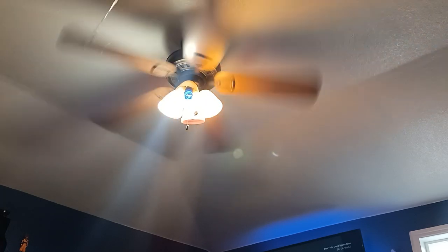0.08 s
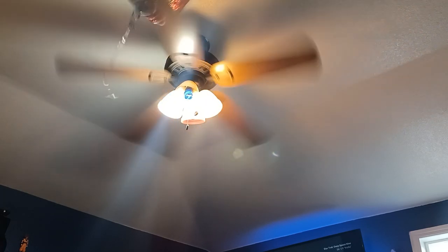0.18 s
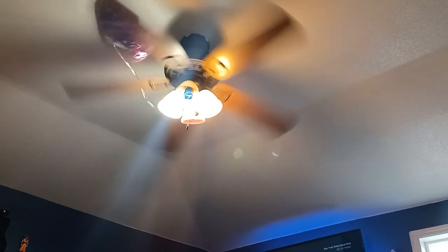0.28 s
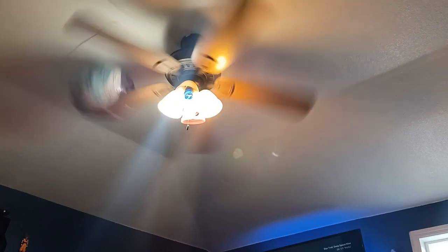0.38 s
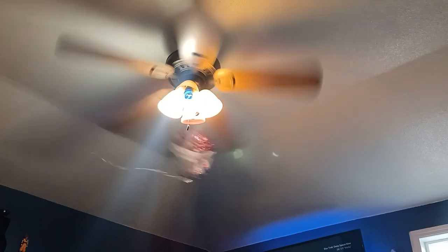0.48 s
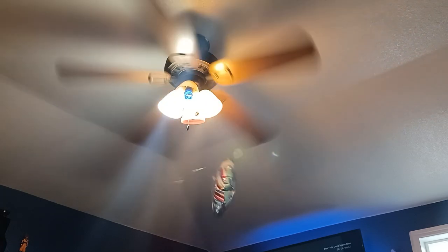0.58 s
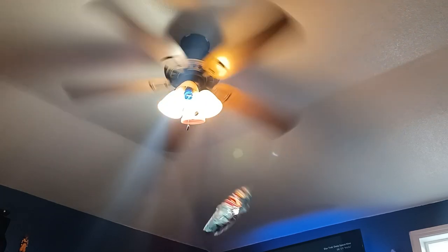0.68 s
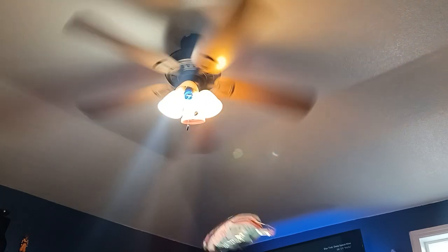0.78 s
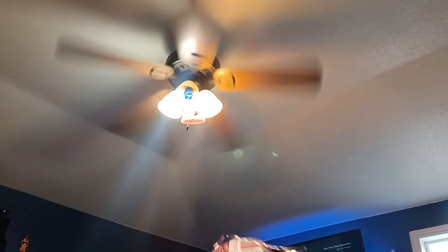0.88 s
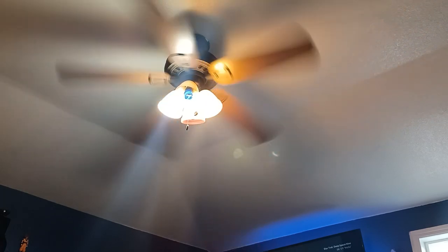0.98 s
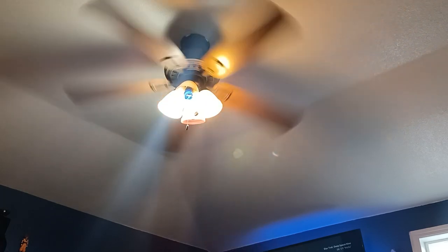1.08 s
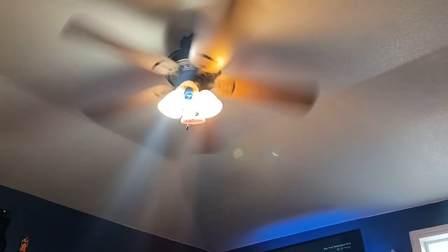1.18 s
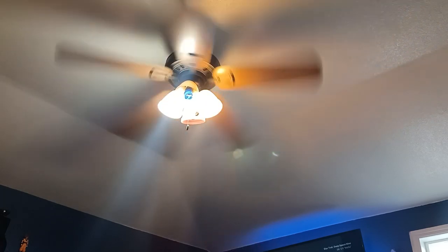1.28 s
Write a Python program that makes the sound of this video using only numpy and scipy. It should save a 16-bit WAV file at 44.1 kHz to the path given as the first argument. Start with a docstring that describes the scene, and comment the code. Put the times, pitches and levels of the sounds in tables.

```python
"""A foil balloon drifts into a spinning ceiling fan in a small room, over a steady motor hum and rush of air.
The blades graze it, smack it twice and fling it away, with a weaker blow later on.
Blows buckle the skin in runs of pops (filtered random clicks) and set the foil crinkling (denser clicks);
hard snaps are single pulses, and pushes on the gas ring decaying sine modes.
The balloon then flutters and wafts low puffs of air, and rustles faintly as it falls (shaped noise)."""
import sys
import numpy as np
from scipy.fft import rfft, irfft
from scipy.io import wavfile
from scipy.ndimage import uniform_filter1d

SR = 44100
rng = np.random.default_rng(int(sys.argv[2]) if len(sys.argv) > 2 else 0)


def persist_wave(psi):
    """Save psi, clipped to +-1, as 16-bit WAV."""
    counts = np.round(np.clip(psi, -1, 1) * 32767).astype(np.int16)
    wavfile.write(sys.argv[1], SR, np.atleast_2d(counts).T)


N = 59535
T = np.arange(N) / SR
SIZE = 2 ** 17  # transform length, samples
HZ = np.maximum(np.arange(SIZE // 2 + 1) * SR / SIZE, 1)
PLACES = 5  # sounding places on the tumbling balloon

# relative spectrum of a buckling panel of skin: frequency_hz, density_db (per Hz)
PANEL_SPECTRUM = [(25, -42.5), (55, -20), (100, -14), (150, -16.5), (190, -12), (230, 1.5), (290, 1.5),
                  (370, -3), (520, 2), (850, -2), (1300, -2.5), (1800, -3.5), (2400, -16.5), (4500, -21),
                  (9000, -45)]
# relative spectrum of the large creases: frequency_hz, density_db (per Hz)
LARGE_CREASE_SPECTRUM = [(150, -17.5), (500, -4.5), (2000, 1.5), (3200, 2), (5400, 1.5), (7000, -3),
                         (8300, -15.5), (10000, -15), (15500, -26)]
# relative spectrum of the tiny creases: frequency_hz, density_db (per Hz)
TINY_CREASE_SPECTRUM = [(3000, -30), (7000, -20), (8500, -10.5), (10000, -5), (12800, -0.5), (15500, -5)]


def from_db(db):
    """Level to amplitude ratio: 20 dB is a factor of ten."""
    return 10 ** (np.asarray(db) / 20)


def rms_one(x):
    """Normalization: mean square of one."""
    return x / np.sqrt(np.mean(x ** 2) + 1e-20)


def at_hz(points, hz):
    """Interpolation along a logarithmic frequency axis."""
    frequency_hz, value = np.transpose(points)
    return np.interp(np.log(hz), np.log(frequency_hz), value)


def at_time(points):
    """Amplitude envelope from levels interpolated linearly in decibels."""
    return from_db(np.interp(T, *np.transpose(points)))


def pan(db):
    """Level-difference stereo: half the difference is added left and taken off right."""
    return from_db(np.array([[.5], [-.5]]) * db)


def colour(points):
    """Minimum-phase response: folding the cepstrum makes a given spectrum causal, at unit power."""
    cepstrum = irfft(np.log(rms_one(from_db(at_hz(points, HZ)))))
    cepstrum[1:SIZE // 2] *= 2
    cepstrum[SIZE // 2 + 1:] = 0
    return np.exp(rfft(cepstrum))


def through(x, response):
    """Linear filtering: convolution is multiplication of spectra."""
    return irfft(rfft(x, SIZE) * response, SIZE)[..., :N]


def delay(seconds):
    """A time delay is a phase proportional to frequency."""
    return np.exp(-2j * np.pi * HZ * seconds)


def diffuse():
    """Interaural coherence: mid and side noise are mixed to a set left-right correlation in each band."""
    # left-right correlation: frequency_hz, correlation (-1 to 1)
    likeness = [(100, 0.77), (280, 1), (600, -0.13), (1100, -0.44), (1800, -0.78), (3500, -.4),
                (7000, -0.086), (14000, -0.27)]
    alike = np.clip(at_hz(likeness, HZ), -.99, .99)
    mid_side_gains = np.sqrt([(1 + alike) / 2, (1 - alike) / 2])
    mid, side = through(rng.standard_normal((2, N)), mid_side_gains)
    return np.array([mid + side, mid - side])


def room_tails():
    """Reverberation: from each place, diffuse echoes decay exponentially at a rate set in each octave."""
    # reverberation time: frequency_hz, t60_s
    room_t60 = [(100, 0.59), (300, 0.39), (1000, .36), (5000, .34), (14000, 0.23)]
    first_echo_s = .0011
    early_db, early_s = -3, .0027  # extra strength and life of the first echoes, off the ceiling
    length = 2 ** 15
    centres_hz = 62.5 * 2 ** np.arange(9)
    noise = rfft(np.array([diffuse()[:, :length] for _ in range(PLACES)]))
    t = T[:length]
    log_hz = np.log(HZ[::SIZE // length])
    early = 1 + from_db(early_db) * np.exp(-t / early_s)
    tails = 0
    for k, hz in enumerate(centres_hz):
        # triangular band, one at its own centre and zero at the neighbours
        band = np.interp(log_hz, np.log(centres_hz), np.arange(len(centres_hz)) == k)
        decay = from_db(-60 * t / at_hz(room_t60, hz)) * (t > first_echo_s) * early
        tails = tails + irfft(noise * band) * decay / np.sqrt(np.sum(decay ** 2))
    return rfft(tails, SIZE)


def heard(tail, room_db):
    """Direct-to-reverberant ratio: the two powers are weighted to a sum of one."""
    return (1 + from_db(room_db) * tail) / np.sqrt(1 + from_db(2 * room_db))


def fan():
    """Steady tones of wavering amplitude (motor hum) over broadband flow noise (air off the blades)."""
    # motor tones: frequency_hz, level_db (RMS before the waver)
    hum = [(120.5, -67), (228, -74.5)]
    # relative spectrum of the rushing air: frequency_hz, density_db (per Hz)
    air = [(25, -34), (42, -19), (62, -8), (110, -3.5), (170, -3.5), (290, -2.5), (380, -4.5), (480, -10),
           (800, -23), (1300, -21.5), (2200, -36.5), (5000, -51.5), (15000, -39)]
    air_db, waver_depth = -66.5, .25
    out = from_db(air_db) * through(diffuse(), colour(air))
    for hz, db in hum:
        waver = np.interp(T, np.linspace(0, T[-1], num=16), rng.standard_normal(size=16))
        tone = np.sin(2 * np.pi * (hz * T + rng.random()))
        out = out + np.sqrt(2) * from_db(db) * (1 + waver_depth * waver) * tone
    return out


def fall():
    """Friction noise: the balloon rustles faintly on its way down, as shaped noise under an envelope."""
    # rustle envelope: time_s, level_db
    fall_levels = [(.6, -70.5), (.78, -62), (.86, -61), (.95, -63), (1.03, -69), (1.12, -81.5), (1.35, -94)]
    # relative spectrum of the rustle: frequency_hz, density_db (per Hz)
    fall_spectrum = [(30, -23.5), (100, -7.5), (260, 2), (600, -9), (1000, -8.5), (1600, -8), (2400, -18.5),
                     (3700, -22.5), (5500, -15.5), (8000, -32), (13000, -31), (16000, -36.5)]
    return at_time(fall_levels) * through(diffuse(), colour(fall_spectrum))


def waft():
    """Displacement of air: the limp body wobbles and pushes soft, low puffs, as low-frequency noise."""
    # puff envelope: time_s, level_db
    waft_levels = [(0, -57), (.1, -56), (.3, -76), (.5, -51), (.62, -56), (.71, -68.5), (.8, -91.5)]
    # relative spectrum of the puffs: frequency_hz, density_db (per Hz)
    waft_spectrum = [(30, -34.5), (50, -15.5), (70, -10), (105, -4), (150, -1.5), (250, -14), (800, -64)]
    return at_time(waft_levels) * through(diffuse(), colour(waft_spectrum))


def thumps():
    """Modal resonance: a push makes the gas inside ring hollowly, swelling while the blade presses in."""
    # pushes on the gas: start_s, low_modes_db, upper_modes_db, focus_hz (where upper modes are struck best)
    pushes = [(.207, -24.5, -26, 864), (.301, -14, -19, 522), (0.895, -52, -62, 398.3)]
    # modes of the balloon: frequency_hz, level_db (relative), t60_s
    modes = [(152, -13, .22), (227, 0, .33), (258, -4, .22), (279, 1, .27), (459, -1, .34), (511, -8, .3),
             (553, -3, .26), (588, -6, .3), (790, -3, .24), (880, -3, .28), (921, -6, .2), (1080, -3, .28),
             (1213, -5, .4), (1335, -2, .24), (1393, -3, .22)]
    low_modes_below_hz, focus_db_per_octave, swell_s = 350, 8, .024
    out = np.zeros(N)
    for start_s, low_db, upper_db, focus_hz in pushes:
        age = np.maximum(T - start_s, 0)
        swell = np.minimum(age / swell_s, 1)
        for hz, mode_db, t60_s in modes:
            if hz < low_modes_below_hz:
                push_db = low_db
            else:
                push_db = upper_db - focus_db_per_octave * abs(np.log2(hz / focus_hz))
            ring = from_db(push_db + mode_db - 60 * age / t60_s)
            out += swell * ring * np.sin(2 * np.pi * hz * age)
    return out


def clicks(per_s, spread_db):
    """Random impulse process: uneven clicks, evened in short-term power, are dealt out among the places."""
    happens = rng.random(N) < per_s / SR
    size = from_db(spread_db * rng.standard_normal(N))
    train = happens * size * rng.choice([-1, 1], N)
    local_power = np.abs(uniform_filter1d(train ** 2, size=300))
    train = train / np.sqrt(local_power + 1e-6)
    return train * (rng.integers(0, PLACES, N) == np.arange(PLACES)[:, None])


def strain(level_column, release_s, flutter_db):
    """Power summation: each blow works the skin by attack, hold and release, over the flutter."""
    # blade contacts and jolts of the skin: start_s, length_s, pops_db, crinkle_db
    blows = [(0.0, 0.069, -52.5, -46), (0.046, 0.0087, -43.5, -39.5), (0.105, 0.015, -43, -41),
             (0.125, 0.0093, -39, -35.5), (.134, .022, -40, -43.5), (0.204, .005, -28, -31.5),
             (0.2097, 0.018, -27, -25), (0.299, .017, -15.5, -23), (0.318, .009, -15, -23),
             (0.328, 0.027, -21.5, -28.5), (0.472, 0.0067, -41, -53), (0.562, 0.014, -31.5, -32)]
    # loose foil between the blows: time_s, level_db (before flutter_db is added)
    flutter = [(0, -44.5), (.09, -51), (.185, -61), (.28, -50.5), (.35, -33), (.40, -34), (.45, -40.5),
               (.5, -35), (.54, -39.5), (.6, -36), (.66, -83), (.72, -91)]
    attack_s = .001
    power = (at_time(flutter) * from_db(flutter_db)) ** 2
    for blow in blows:
        start_s, length_s = blow[:2]
        attack = np.clip((T - start_s) / attack_s, 0, 1)
        release = np.exp(-np.maximum(T - start_s - length_s, 0) / release_s)
        power = power + (from_db(blow[level_column]) * attack * release) ** 2
    return np.sqrt(power)


def creases(tails, spectrum, release_s, flutter_db, room_db):
    """Interaural time difference: creases flip at random, each place reaching the sides with its own lag."""
    max_lag_s = .0003
    runs = clicks(per_s=3000, spread_db=5.0) * strain(3, release_s, flutter_db)
    foil = colour(spectrum)
    out = 0
    for run, tail, lag_s in zip(runs, tails, np.linspace(-1, 1, PLACES) * max_lag_s):
        right_lag = delay(np.array([[0], [lag_s]]))
        out = out + through(run, foil * heard(tail, room_db) * right_lag)
    return out


def crinkle(tails):
    """Two scales of crackling: large creases rustle on after a blow, tiny ones sizzle mostly under the blade."""
    large = creases(tails, LARGE_CREASE_SPECTRUM, release_s=.02, flutter_db=0, room_db=7.5)
    tiny = creases(tails, TINY_CREASE_SPECTRUM, release_s=.0017, flutter_db=-3, room_db=4.5)
    return from_db(-3) * large + from_db(-1.5) * tiny


def pops(tails):
    """Repeated buckling: panels of the skin flip in quick runs, each an impulse through the skin's response."""
    runs = clicks(per_s=900, spread_db=4.0) * strain(2, release_s=.008, flutter_db=.5)
    skin = colour(PANEL_SPECTRUM)
    return sum(through(run, skin * heard(tail, room_db=2)) for run, tail in zip(runs, tails))


def snaps(tails):
    """Snap-through instability: a taut panel flips all at once, a pressure pulse with a bright tick in front."""
    # single hard snaps of the skin: start_s, pulse_db (peak, before the room), tick_db
    hard_snaps = [(.0445, -25, -27.5), (.1063, -21.5, -34.5), (0.13, -24.5, -21.5), (.2126, -12, -14.5),
                  (0.2233, -9.5, -17.5), (0.3016, -8, -9.5), (0.3252, -2.5, -3.5), (0.3322, -15, -17.5),
                  (.567, -24.5, -18.5)]
    skin = colour(PANEL_SPECTRUM)
    unit_pulse = skin / irfft(skin).max()
    tick = (colour(LARGE_CREASE_SPECTRUM) + colour(TINY_CREASE_SPECTRUM)) / 2
    out = 0
    for k, (start_s, pulse_db, tick_db) in enumerate(hard_snaps):
        snap = from_db(pulse_db) * unit_pulse + from_db(tick_db) * tick
        out = out + snap * delay(start_s) * heard(tails[k % PLACES], room_db=-1)
    return irfft(out)[:, :N]


def scene():
    """Superposition: balloon and fan add up, then lean left or right by frequency."""
    # stereo balance: frequency_hz, left_minus_right_db
    balance = [(70, -8), (150, -7), (260, 4), (550, 2.5), (1000, 8), (1800, 8), (2700, -2), (5000, -0.5),
               (13000, -.5)]
    tails = room_tails()
    balloon = pops(tails) + snaps(tails) + crinkle(tails) + thumps() + waft() + fall()
    return through(balloon + fan(), pan(at_hz(balance, HZ)))


def record(dry):
    """Saturation and band limiting: peaks are rounded, rumble is rolled off and the top is cut steeply."""
    low_cut_hz, cutoff_hz = 45, 15800
    low_cut = (1j * HZ / (low_cut_hz + 1j * HZ)) ** 2
    high_cut = 1 / np.sqrt(1 + (HZ / cutoff_hz) ** 300)
    return through(np.tanh(dry), low_cut * high_cut)


dry = scene()
out = record(dry)
persist_wave(out)
```